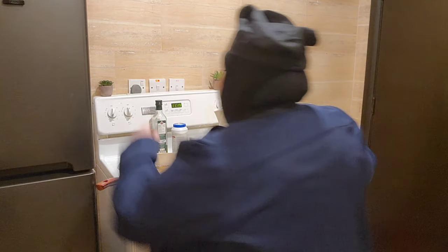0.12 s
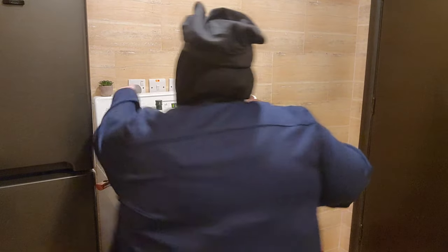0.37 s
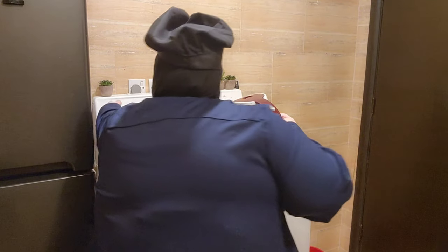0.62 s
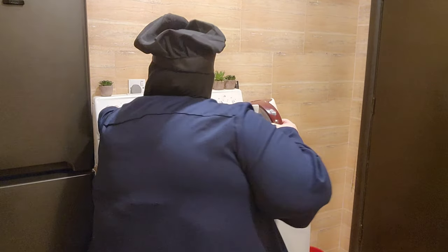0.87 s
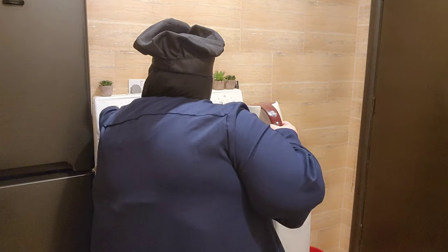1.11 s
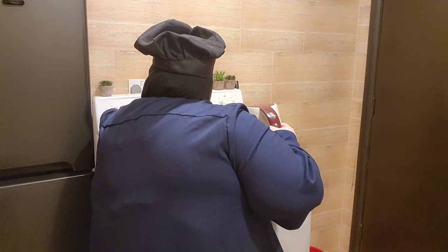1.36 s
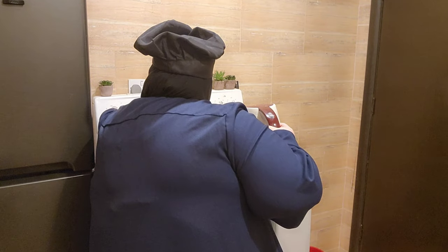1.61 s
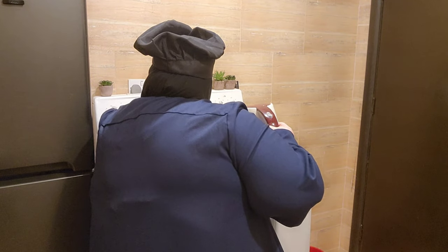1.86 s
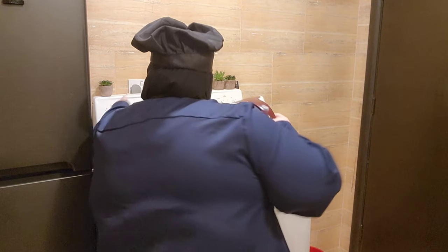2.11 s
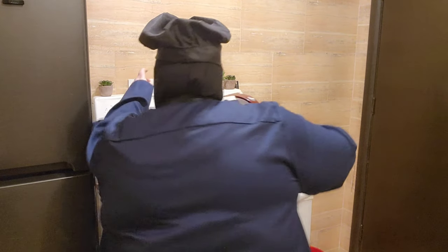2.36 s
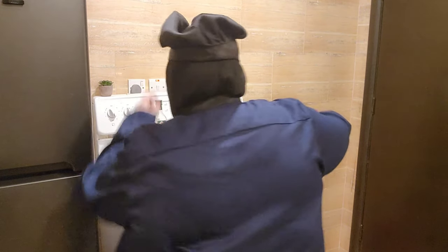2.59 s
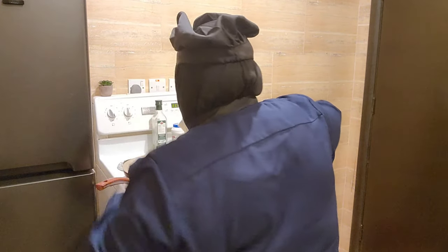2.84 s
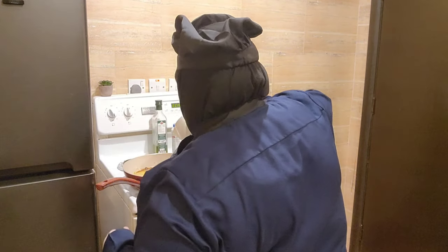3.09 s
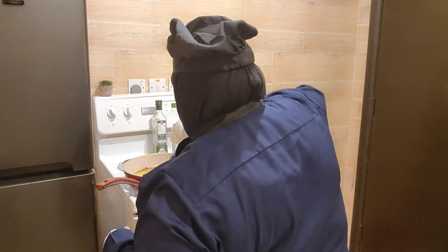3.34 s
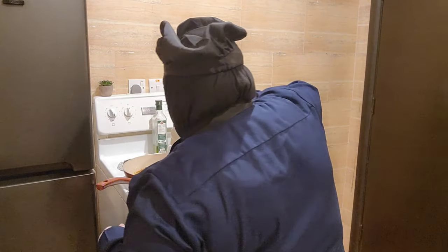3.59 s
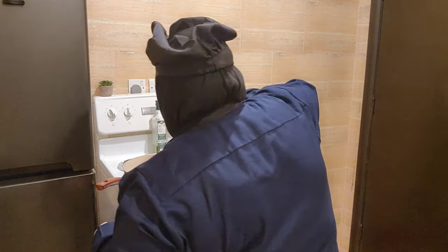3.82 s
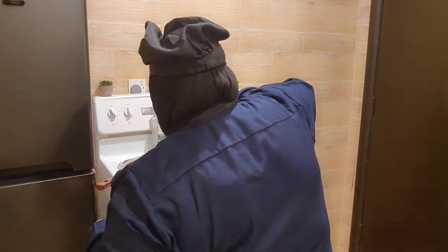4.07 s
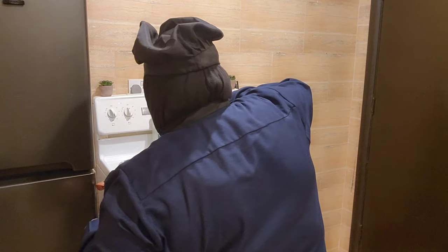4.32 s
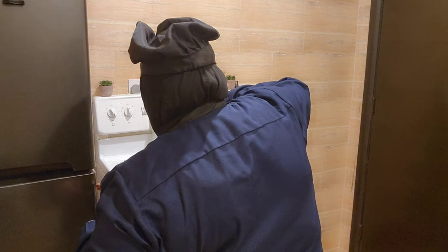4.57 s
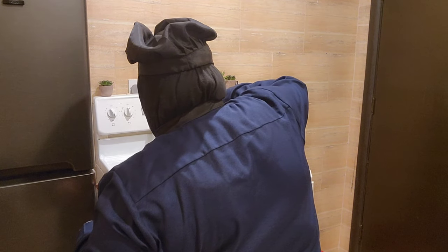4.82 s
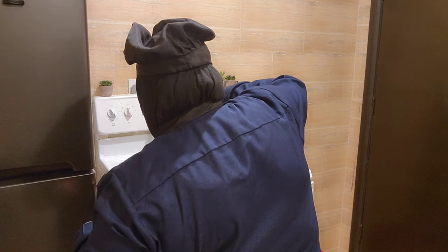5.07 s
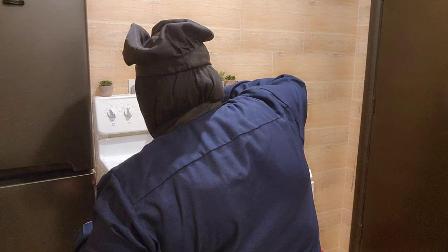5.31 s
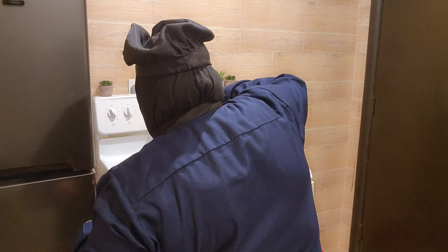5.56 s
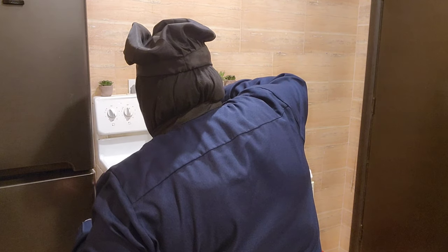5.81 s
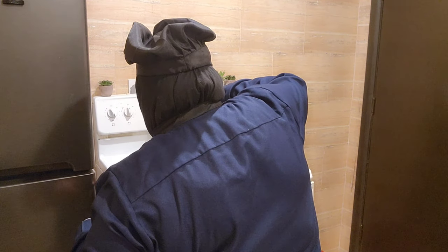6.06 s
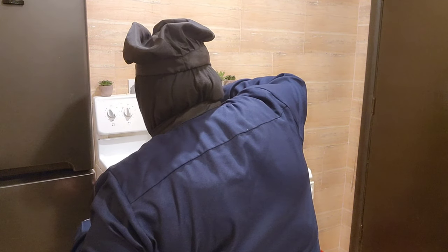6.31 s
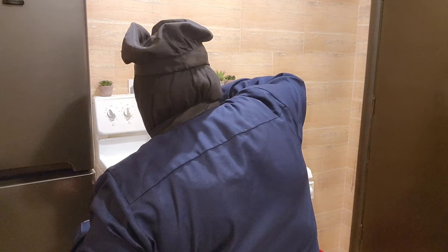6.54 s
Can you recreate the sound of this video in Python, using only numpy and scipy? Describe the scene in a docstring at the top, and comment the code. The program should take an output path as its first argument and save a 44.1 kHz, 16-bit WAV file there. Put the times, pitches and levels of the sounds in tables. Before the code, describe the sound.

A kitchen extractor fan runs unbroken for about 6.7 seconds in a small tiled room. Its blades sing a smooth low hum near 230 Hz, dipping very slightly in pitch between 1.3 and 2 s and growing a touch firmer. Around it is a dark, low-heavy rush of air, swelling gently, with narrow, faint whistles fluttering inside it. From 0 to 0.9 s the cook turns: quiet airy cloth rubs, strongest near 0.4 s, and soft gritty foot scuffs. Around 2.3 to 2.6 s more scuffs pass, then a light cloth rub near 2.9 s. Very faint crinkles touch 3.6 and 4 s, otherwise just fan. At 5.5 s a crisp, bright crinkle snaps and fades, with smaller ones near 5.9, another sharp one at 6.2, and soft rustling to the end. Close stereo microphones, short room reflections, fan slightly right.

```python
"""Kitchen extractor fan and a cook

A fan runs in a small tiled kitchen. Its blades sing as a near sine, over noise shaped into a rush of air
by room and duct resonances; narrow bands of noise make whistles whose level flutters and lifts at times.
A cook moves near the stove: filtered grainy noise makes clothes rustle, feet scuff and something crisp
crinkle, mostly near the end. Two close microphones hear it all, the fan a little to the right."""
import sys
import numpy as np
from scipy import signal
from scipy.fft import rfft, irfft, next_fast_len
from scipy.io import wavfile

SR = 44100
rng = np.random.default_rng(int(sys.argv[2]) if len(sys.argv) > 2 else 0)


def file_out(sig):
    """Save sig as 16-bit WAV at sys.argv[1]."""
    # one column per channel
    cols = np.atleast_2d(sig).T
    # limit, then scale
    lim = np.clip(cols, -1, 1)
    pcm = np.round(lim * 32767).astype(np.int16)
    wavfile.write(sys.argv[1], SR, pcm)


def rack_gain(trim_db):
    """Turn a fader trim in dB into the linear factor to multiply a signal by."""
    fader = np.asarray(trim_db, float)
    return 10 ** (fader / 20)


N = 294147  # length in samples
LEFT_LAG_S = 0.00022  # the fan reaches the left microphone this much later


def rms_one(x):
    """Scale a sound to an rms of 1, over all its rows together."""
    return x / np.sqrt(np.mean(x ** 2) + 1e-20)


def in_time(rows):
    """Turn a table that starts with times into curves, one value per sample."""
    s, *columns = np.transpose(rows)
    return [np.interp(np.arange(N) / SR, s, c) for c in columns]


def at_hz(points, hz):
    """Read a spectrum between its points on a log-frequency axis."""
    point_hz, value = np.transpose(points)
    return np.interp(np.log(hz + 1), np.log(point_hz), value)


def resonance_db(table, hz):
    """Add up the bumps and dips of resonances, each strongest at its own pitch."""
    return sum(db / (1 + (2 * (hz - top) / width) ** 2) for top, width, db in table)


def drift(rate):
    """Slow chance of spread 1: noise smoothed by two one-pole low-passes at a rate in Hz."""
    r = np.exp(-80 * np.pi * rate / SR)  # drawn at every 40th sample
    white = rng.standard_normal(N // 40 + 2002)
    slow = signal.lfilter([1], [1, -2 * r, r * r], white)[2000:]  # skip the run-in
    return np.interp(np.arange(N) / 40, np.arange(len(slow)), rms_one(slow))


def coloured(white, gain):
    """Give noise its own gain at every frequency; rms 1."""
    size = next_fast_len(N)
    hz = np.arange(size // 2 + 1) * SR / size
    return rms_one(irfft(rfft(white, size) * gain(hz), size)[..., :N])


def band(x, centre_hz, octaves):
    """Keep a band that reaches some octaves to each side of its centre; rms 1."""
    edges = np.clip([centre_hz * 2 ** -octaves, centre_hz * 2 ** octaves], 20, SR * .45)
    return rms_one(signal.sosfilt(signal.butter(2, edges, "band", fs=SR, output="sos"), x))


# faint rubbing that is always there
REST_FINE_DB, REST_COARSE_DB = -82.5, -81
SWELL_PER_FADE = 0.99  # a rub swells over this share of its fade time
# clothes rub as the cook moves: peak_s, peak_db of the fine hiss,
# fade_s (to fall 10 dB; at least .01 s is used), coarse_minus_fine_db
CLOTHES_RUBS = [(.06, -67.5, .07, -0.5), (.3, -68.5, 0.04, 0.5), (.39, -60.5, 0.1, 0),
                (.5, -71.5, 0.7, 1.5), (.68, -67, 0.06, 1.5), (.9, -70, -0.13, 1.5),
                (2.4, -75.5, -0.8, 1.5), (2.62, -76, .3, 0), (2.92, -68.5, 0.46, -3.5),
                (4.33, -80.5, 0, -0.5), (5.55, -75.5, .5, -0.5), (5.84, -71, .4, 1.5), (6.04, -74, -0.1, 1),
                (6.319, -73, 0.7, 1), (6.46, -73, 0.7, 0.5), (6.62, -75, 1.3, -0.5)]


def rustle():
    """Each rub swells and fades; fibres slip in dense uneven grains, so the hiss flickers a little."""
    t = np.arange(N) / SR
    fine_power, coarse_power = rack_gain(2 * REST_FINE_DB), rack_gain(2 * REST_COARSE_DB)
    for peak_s, peak_db, fade_s, coarse_db in CLOTHES_RUBS:
        from_peak_s = np.maximum(t - peak_s, (peak_s - t) / SWELL_PER_FADE)
        power = rack_gain(2 * (peak_db - 10 * from_peak_s / max(fade_s, .01)))
        fine_power = fine_power + power
        coarse_power = coarse_power + power * rack_gain(2 * coarse_db)
    grains = rng.standard_normal((2, N)) * rack_gain(1.2 * drift(60.0))
    fine = band(grains, 11500, octaves=.6)
    coarse = band(grains, 7000, octaves=.7)
    lean = rack_gain(np.array([[-1.2], [1.2]]))  # softer left, louder right
    return (np.sqrt(fine_power) * fine + np.sqrt(coarse_power) * coarse) * lean


# bands of these soft sounds that stand out, as a floor rings under a sole: pitch_hz, width_hz, lift_db
FLOOR_RESONANCES = [(1480, 90, 5), (1600, 60, 4), (1800, 70, 6), (1990, 70, 5), (2310, 80, 5)]
# soft scuffs of feet, and near the end dull, soft crinkles:
# peak_s, length_s, peak_level_db, centre_hz, half_width_octaves
SCUFFS_AND_SOFT_CRINKLES = [(.26, .08, -58, 1800, .05), (.29, .06, -60, 1450, .06),
                            (.335, .26, -56.5, 1750, .35), (.33, .24, -66, 4500, .6),
                            (.66, .4, -68, 4300, .6), (.38, .05, -58.5, 1450, .1), (.45, .1, -61, 1600, .2),
                            (.7, .14, -58, 900, .5), (2.33, .14, -57, 1850, .3),
                            (2.41, .12, -57, 2250, .12), (2.45, .18, -58.5, 1800, .3),
                            (2.41, .13, -61.5, 3900, .3), (3.07, .08, -65, 3100, .15),
                            (5.77, .06, -67, 4200, .5), (6.03, .05, -67, 4500, .6),
                            (5.9, .3, -68, 4000, .6), (6.33, .3, -65, 3500, .7), (6.46, .18, -58, 1750, .4)]


def scuffs_and_soft_crinkles():
    """Uneven noise swells and fades as soles slide or something crinkles; partly alike in both microphones."""
    t, out = np.arange(N) / SR, np.zeros((2, N))
    grains = (rng.standard_normal(N) + rng.standard_normal((2, N))) * rack_gain(2.3 * drift(70))
    ringing = coloured(grains, lambda hz: rack_gain(resonance_db(FLOOR_RESONANCES, hz)))
    for peak_s, length_s, level_db, centre_hz, octaves in SCUFFS_AND_SOFT_CRINKLES:
        once = band(ringing, centre_hz, octaves)
        steep = band(once, centre_hz, octaves)  # filtered twice for steeper edges
        out += steep * rack_gain(level_db) * np.exp(-(2 * (t - peak_s) / length_s) ** 4)
    return out


# crisp crinkles: start_s, bright_db (around 11.5 kHz), dull_db (around 5.2 kHz), fade_s (to fall 60 dB)
CRISP_CRINKLES = [(3.62, -77, -76, .06), (3.98, -78, -75, .06), (5.462, -63, -59, .06),
                  (5.4665, -51, -54, .012), (5.468, -60.5, -56.5, .35), (5.848, -69, -70, .15),
                  (5.976, -65, -66, .3), (6.02, -69, -66, .15), (6.2315, -51, -62, .015),
                  (6.236, -61.5, -65, .38), (6.42, -67, -68, .25)]


def crinkles():
    """Each crinkle starts at once and dies away as bright grains, partly alike in both microphones."""
    t, out = np.arange(N) / SR, np.zeros((2, N))
    noise = rng.standard_normal(N) + .9 * rng.standard_normal((2, N))
    grains = noise * rack_gain(2 * drift(150))
    bright = band(grains, 11500, octaves=.4)
    dull = band(grains, 5200, octaves=1)
    for start_s, bright_db, dull_db, fade_s in CRISP_CRINKLES:
        fade = (t > start_s) * rack_gain(-60 * np.abs(t - start_s) / fade_s)
        out += (rack_gain(bright_db) * bright + rack_gain(dull_db) * dull) * fade
    return out


FLUTTER_DB, FLUTTERS_PER_S = 2.2, 10
WANDER, WANDERS_PER_S = .005, 4  # the pitch strays by about this share
NEAR = .02  # a lift acts on the bands within this share of its pitch
# whistles of duct and grille: pitch_hz, width_hz, level_db (before lifts and flutter)
DUCT_WHISTLES = [(296, 14, -58), (339, 16, -55.5), (1606, 45, -67.5), (2170, 30, -70), (2200, 70, -72)]
# moments when a narrow band of the noise happens to be louder: peak_s, length_s, pitch_hz, lift_db
NARROW_BAND_LIFTS = [(.1, .3, 296, 9), (.65, .2, 296, 7), (1.5, .4, 296, 8), (2.05, .2, 296, 7),
                     (.1, .2, 339, 6), (1.75, .4, 339, 7), (2.15, .15, 339, 6), (2.7, .3, 339, 8),
                     (4.6, .5, 339, 5), (.15, .12, 2180, 5), (.8, .1, 2180, 7), (1.55, .06, 2180, 7),
                     (1.71, .12, 2180, 8), (2.3, .12, 2180, 6), (.12, .08, 1606, 5), (.36, .12, 1606, 6),
                     (1.6, .08, 1606, 5), (2.39, .14, 1606, 7), (3.97, .12, 1606, 7)]


def whistles():
    """Air through duct and grille sings in narrow bands that stray in pitch and vary in level."""
    t, out = np.arange(N) / SR, np.zeros((2, N))
    for top, width, level_db in DUCT_WHISTLES:
        # slow noise on a cosine and a sine makes a narrow band, nearly alike in both microphones
        noise = rng.standard_normal((2, 1, N)) + 0.13 * rng.standard_normal((2, 2, N))
        sway = coloured(noise, lambda hz: 1 / (1 + (2 * hz / width) ** 2))
        pitch_hz = top * (1 + WANDER * drift(WANDERS_PER_S))
        phase = 2 * np.pi * np.cumsum(pitch_hz) / SR
        narrow = sway[0] * np.cos(phase) + sway[1] * np.sin(phase)
        louder_db = np.zeros(N)
        for peak_s, length_s, hz, lift_db in NARROW_BAND_LIFTS:
            if abs(hz / top - 1) < NEAR:
                louder_db += lift_db * np.exp(-(2 * (t - peak_s) / length_s) ** 2)
        out += rack_gain(level_db + louder_db + FLUTTER_DB * drift(FLUTTERS_PER_S)) * narrow
    return out


ROOM_T60_S, ROOM_DB, ROOM_FROM_HZ = .28, -4.5, 900


def walls(hz):
    """Dense reflections, other ones at each microphone; the bass is left to the resonances."""
    t = np.arange(SR // 2) / SR
    tail = rng.standard_normal((2, len(t))) * rack_gain(-60 * t / ROOM_T60_S) * (t > .003)
    tail = tail / np.sqrt(np.sum(tail ** 2, axis=1, keepdims=True))
    echoes = rfft(tail, next_fast_len(N))
    return rack_gain(ROOM_DB) * echoes * hz ** 2 / (hz ** 2 + ROOM_FROM_HZ ** 2)


SURGES_PER_S = 5.0
# borders between the ranges of the rush: edge_hz
RANGE_EDGES_HZ = [120, 250, 450, 900, 2000, 4000]
# how deeply each range surges, lowest range first: depth_db
RANGE_DEPTHS_DB = [1.5, 2.4, 2.2, 1.3, 1.3, 1.1, 1]


def surges(rush, bright_db):
    """Each range swells and sinks by its own slow chance; brightness lifts those above the blade tone."""
    below = [0]
    for hz in RANGE_EDGES_HZ:
        below.append(signal.sosfilt(signal.butter(1, hz, fs=SR, output="sos"), rush))
    below.append(rush)
    out = 0
    for k, depth_db in enumerate(RANGE_DEPTHS_DB):
        one_range = below[k + 1] - below[k]
        out = out + rack_gain(depth_db * drift(SURGES_PER_S) + bright_db * (k > 1)) * one_range
    return out


# spectrum of the rush, only its shape counts: pitch_hz, level_db (per Hz)
AIR_SPECTRUM = [(20, -18.5), (45, -17.5), (82, -13), (130, -8), (210, -3.5), (275, -13), (316, -20),
                (410, -24.5), (510, -25.5), (900, -31.5), (1300, -34), (2500, -42), (3600, -47),
                (5200, -53), (7000, -58.5), (10000, -71.5), (15500, -82.5)]
# resonances of room and duct: pitch_hz, width_hz, lift_db (a dip where negative)
ROOM_AND_DUCT = [(62, 22, 5), (83, 12, -3), (104, 16, 4), (146, 10, 2.5), (165, 16, 7.5), (179, 10, 1.5),
                 (193, 14, 6), (208, 10, -3), (254, 14, 4), (296, 12, 9), (316, 10, -2.5), (339, 18, 7),
                 (360, 10, -2), (371, 12, 5.5), (400, 12, 2.5), (425, 10, 3.5), (480, 20, 5), (505, 20, -2),
                 (607, 20, -4), (685, 30, 5), (758, 20, 6), (800, 30, -2), (1000, 200, 4.5),
                 (1200, 200, -3), (1480, 120, 3), (1620, 170, 4), (1820, 90, 2), (2100, 200, 3.5),
                 (2200, 120, 2), (2760, 200, -3), (2940, 80, 3), (3180, 400, 2.5), (3500, 150, -2),
                 (4320, 160, 2.5), (4450, 700, 4), (4900, 150, -2.5), (5020, 80, 2.5)]
# how alike both microphones hear the rush, the lag and wall echoes aside: pitch_hz, likeness (0 to 1)
MICROPHONE_LIKENESS = [(30, 0.97), (60, 0.99), (200, 0.98), (300, 0.96), (450, .55), (1000, 0.5),
                       (2500, 0.2), (6000, 0.08), (15000, 0)]
# left minus right: pitch_hz, difference_db
LEFT_MINUS_RIGHT = [(60, 0), (200, -0.9), (600, -2), (1300, 1), (4400, -2), (15000, -2)]
# the rush swells slowly: time_s, level_db (before the surges), brightness_db
DRAUGHT_STRENGTH = [(0, -31.5, 1.5), (.9, -31.5, 0.5), (1.5, -29.5, -1.5), (1.85, -31.5, 1.5),
                    (2.3, -30.5, 1), (3.1, -29.5, -1), (3.9, -32, 1.5), (4.6, -29.5, -0.5),
                    (5.2, -31.5, .5), (5.8, -31.5, 1), (6.67, -32.5, 1.5)]


def air_rush():
    """Turbulent noise excites resonances and walls; part is shared, later on the left, part differs."""
    def colour(hz):
        """Gain of four parts: shared left and right, then separate left and right."""
        lift_db = resonance_db(ROOM_AND_DUCT, hz)
        lean_db = at_hz(LEFT_MINUS_RIGHT, hz) * np.array([[.5], [-.5], [.5], [-.5]])
        alike = np.clip(at_hz(MICROPHONE_LIKENESS, hz), 0, 1)
        direct = np.exp(-2j * np.pi * hz * [[LEFT_LAG_S], [0]])
        together = np.sqrt(alike) * (direct + walls(hz))
        apart = np.sqrt(1 - alike) * (1 + walls(hz))
        return rack_gain(at_hz(AIR_SPECTRUM, hz) + lift_db + lean_db) * np.vstack([together, apart])
    shared, left, right = rng.standard_normal((3, N))
    parts = coloured(np.array([shared, shared, left, right]), colour)
    rush = rms_one(parts[:2] + parts[2:])
    level_db, bright_db = in_time(DRAUGHT_STRENGTH)
    return rack_gain(level_db) * surges(rush, bright_db)


OVERTONE_DB, WAVER_DB = -34.5, .45  # mean overtone level against the tone; spread of the tone's level
# blade tone: time_s, pitch_hz, level_db (before the waver)
BLADE_TONE = [(0, 231.3, -27), (.5, 231.3, -26.3), (.85, 231.3, -27), (1.35, 231.25, -26.6),
              (1.85, 230, -25.5), (2.15, 229.8, -25), (2.85, 229.8, -25.1), (3.2, 229.8, -25.8),
              (4.2, 229.75, -26.1), (4.85, 229.75, -25.4), (5.5, 229.75, -25.5), (6.67, 229.9, -25.8)]


def blade_tone():
    """Blades pass the housing: a near sine with a faint second harmonic, later on the left."""
    hz, level_db = in_time(BLADE_TONE)
    phase = 2 * np.pi * (np.cumsum(hz) / SR - hz * [[LEFT_LAG_S], [0]])
    overtone = rack_gain(OVERTONE_DB + 2.2 * drift(3.2)) * np.sin(2 * phase)
    wave = np.sin(phase) + overtone
    return np.sqrt(2) * rack_gain(level_db + WAVER_DB * drift(1.0)) * wave  # root 2: a sine of rms 1


def scene():
    """The cook's small sounds and the fan, added together."""
    cook = rustle() + scuffs_and_soft_crinkles() + crinkles()
    fan = whistles() + air_rush() + blade_tone()
    return cook + fan


def roll_off(x):
    """The treble ends steeply here."""
    return signal.sosfilt(signal.butter(12, 15510, fs=SR, output="sos"), x)


PORT_HZ, PORT_WIDTH_HZ, PORT_DB = 11500, 700, 3.5


def record(dry):
    """The microphone ports ring faintly in the high treble."""
    b, a = signal.iirpeak(PORT_HZ, PORT_HZ / PORT_WIDTH_HZ, fs=SR)
    ringing = signal.lfilter(b, a, dry)
    mix = dry + (rack_gain(PORT_DB) - 1) * ringing
    return roll_off(mix)


dry = scene()
out = record(dry)
file_out(out)
```